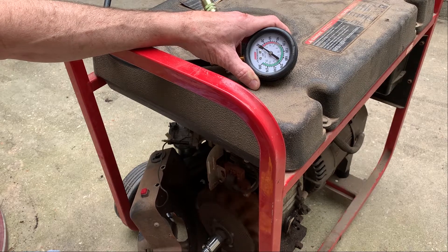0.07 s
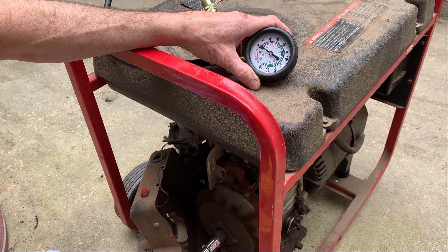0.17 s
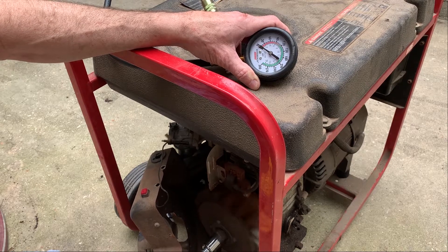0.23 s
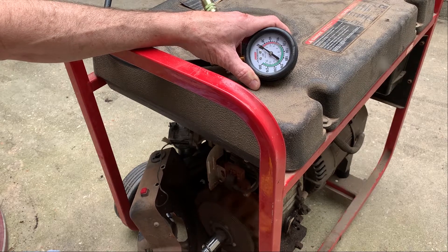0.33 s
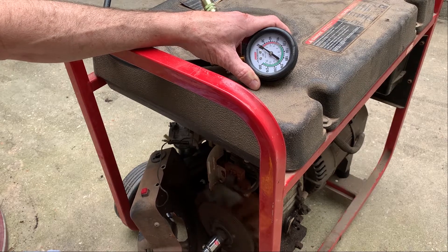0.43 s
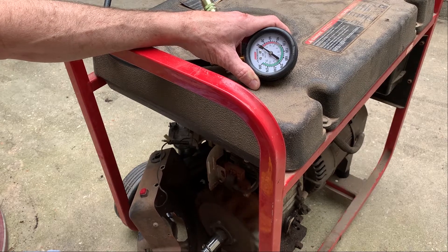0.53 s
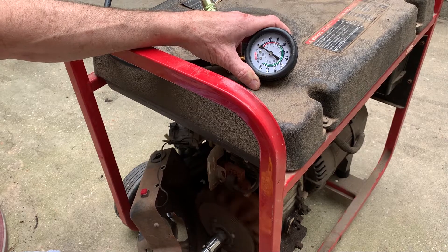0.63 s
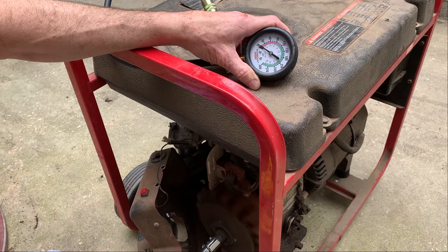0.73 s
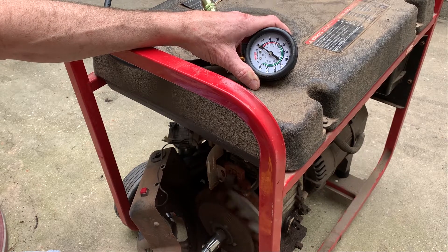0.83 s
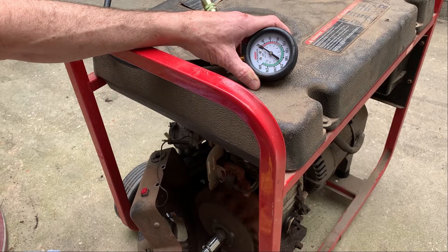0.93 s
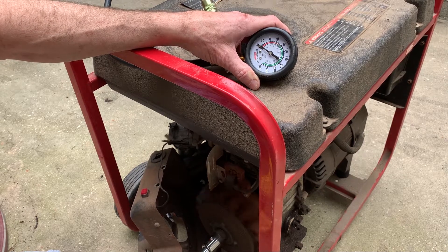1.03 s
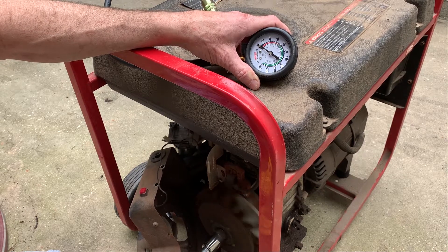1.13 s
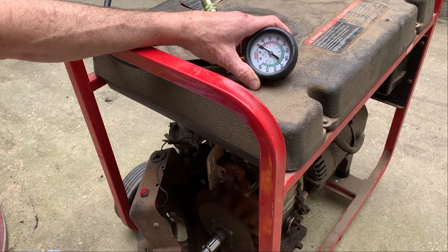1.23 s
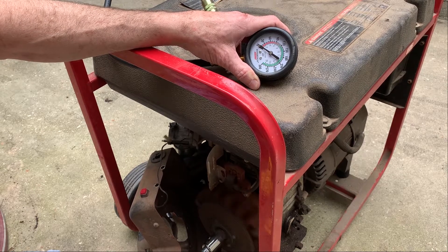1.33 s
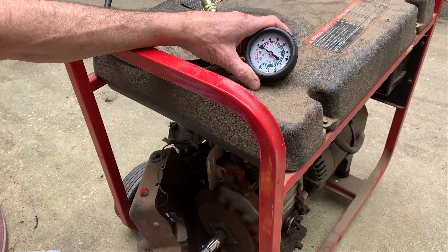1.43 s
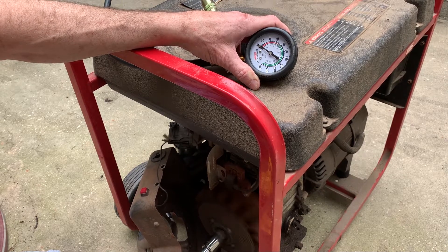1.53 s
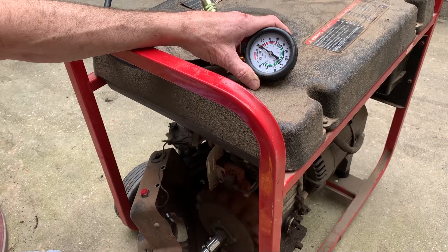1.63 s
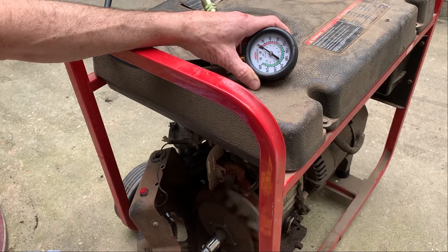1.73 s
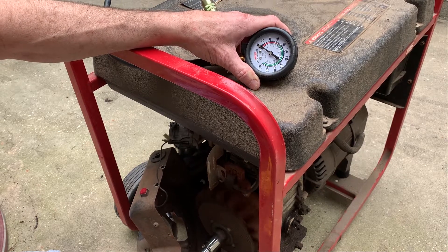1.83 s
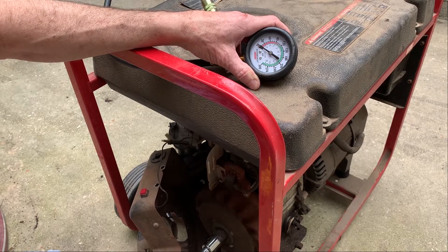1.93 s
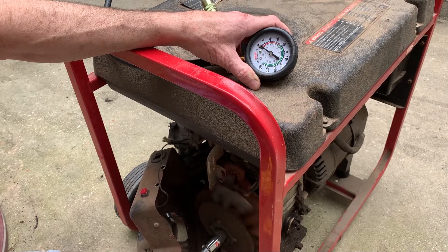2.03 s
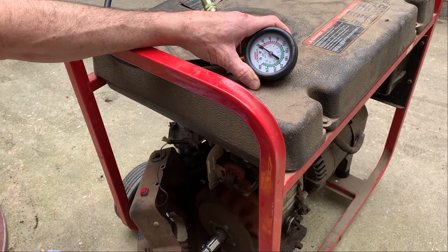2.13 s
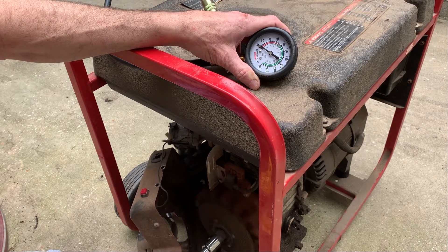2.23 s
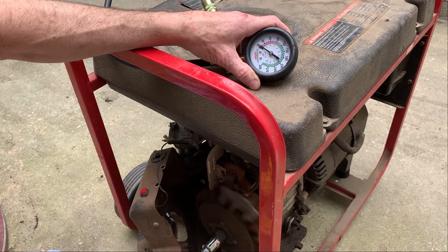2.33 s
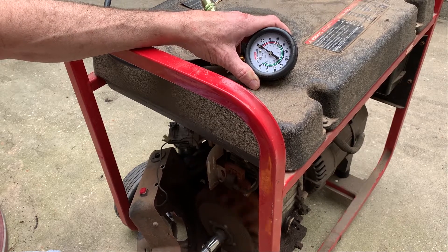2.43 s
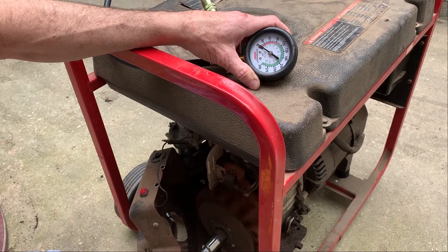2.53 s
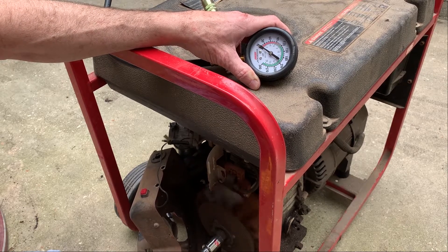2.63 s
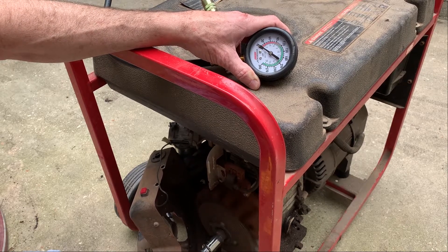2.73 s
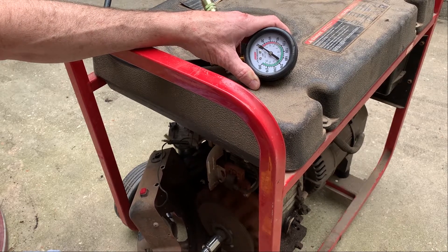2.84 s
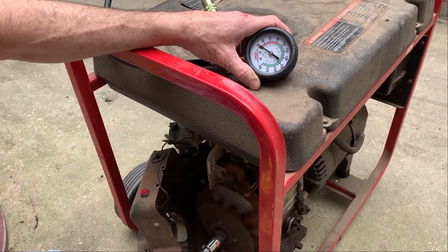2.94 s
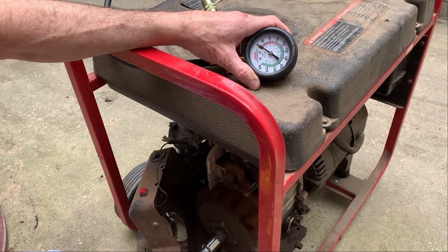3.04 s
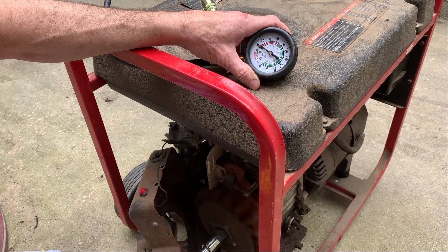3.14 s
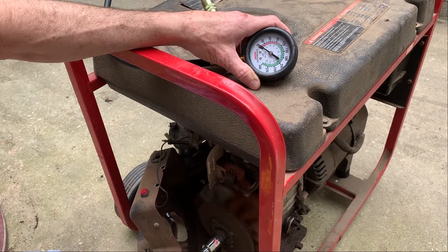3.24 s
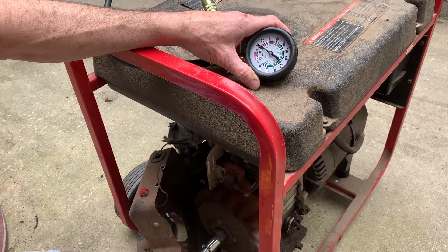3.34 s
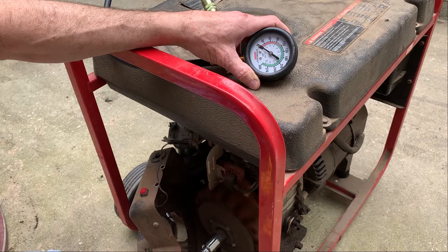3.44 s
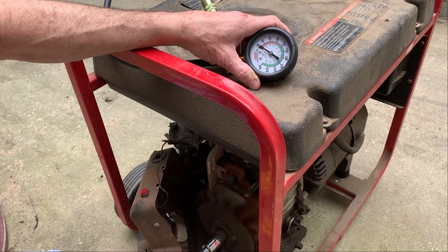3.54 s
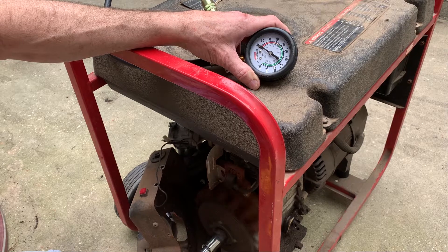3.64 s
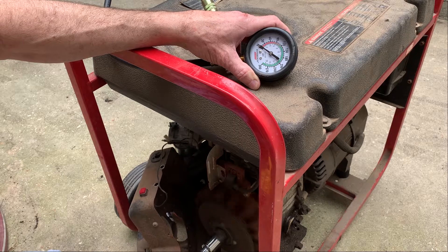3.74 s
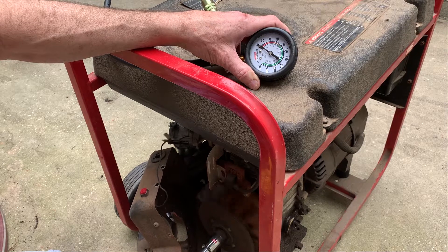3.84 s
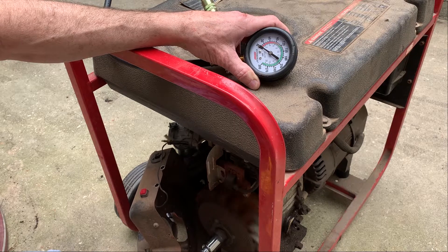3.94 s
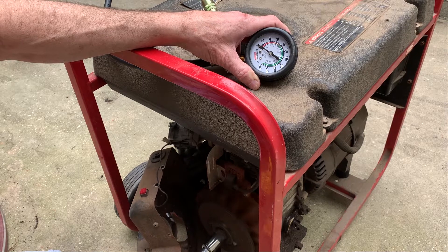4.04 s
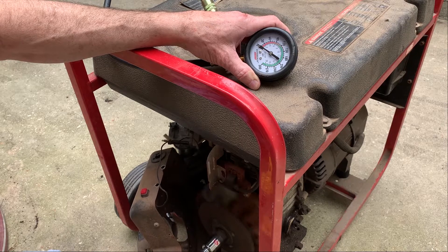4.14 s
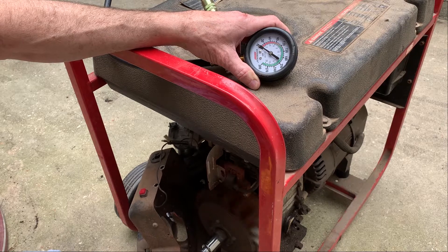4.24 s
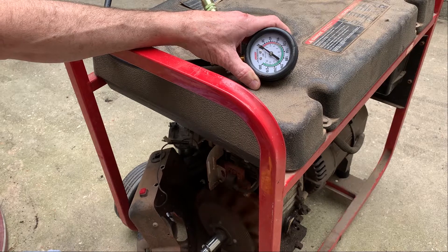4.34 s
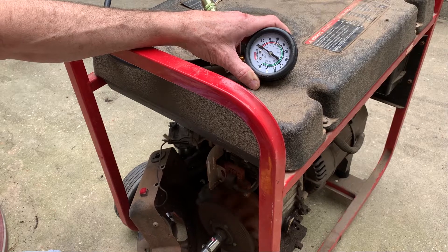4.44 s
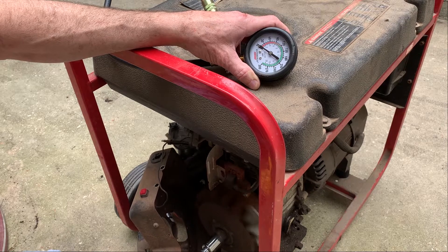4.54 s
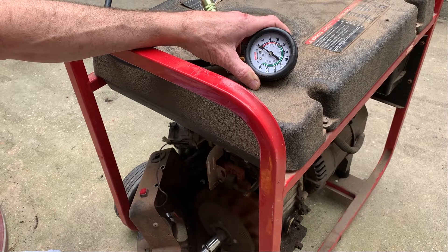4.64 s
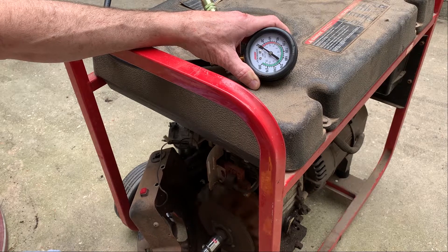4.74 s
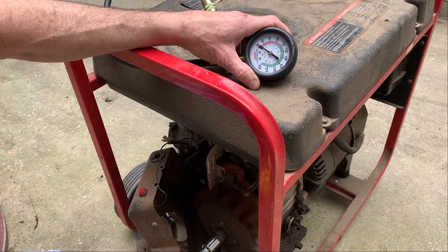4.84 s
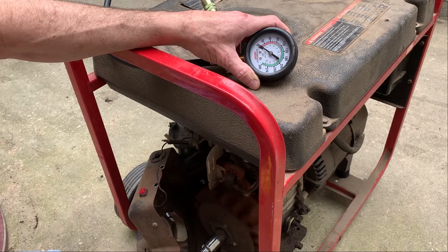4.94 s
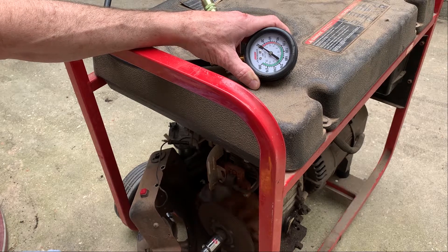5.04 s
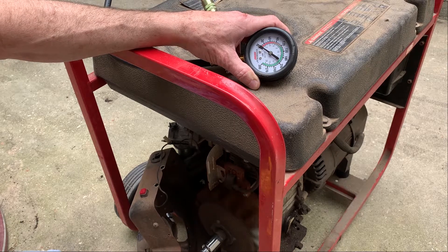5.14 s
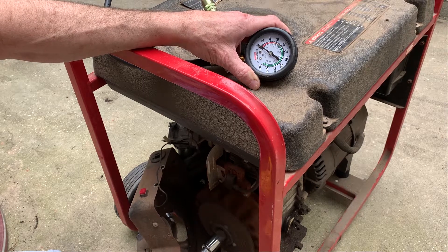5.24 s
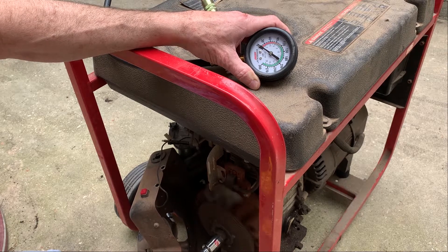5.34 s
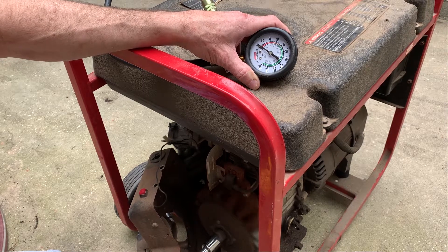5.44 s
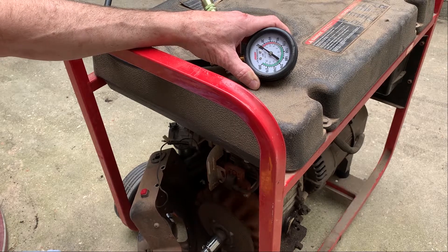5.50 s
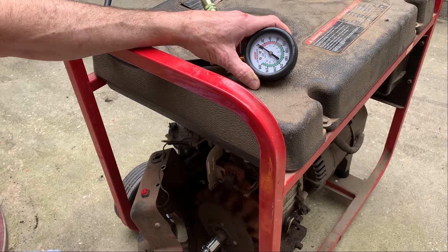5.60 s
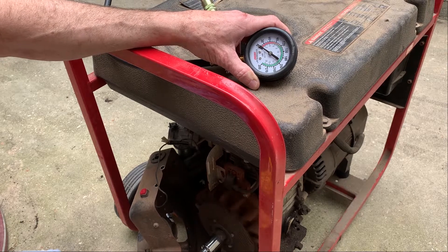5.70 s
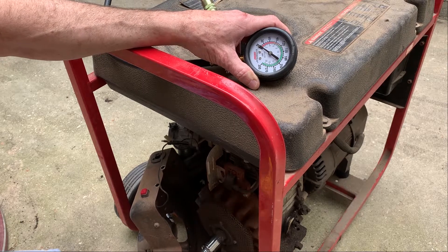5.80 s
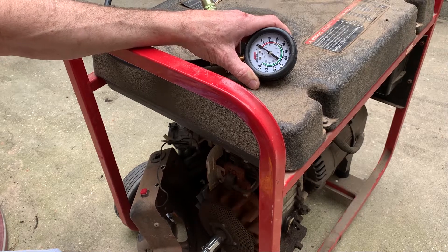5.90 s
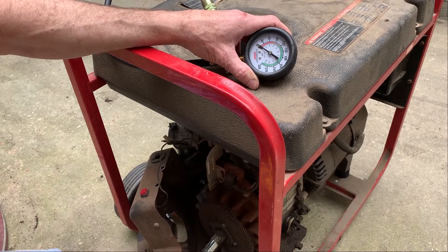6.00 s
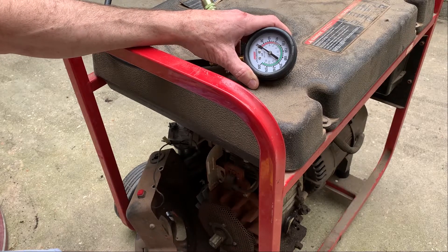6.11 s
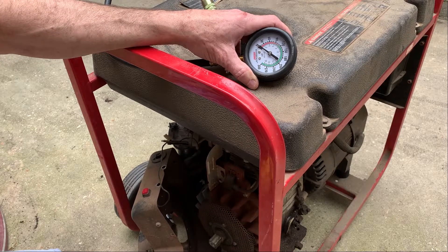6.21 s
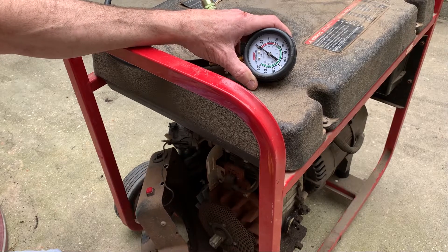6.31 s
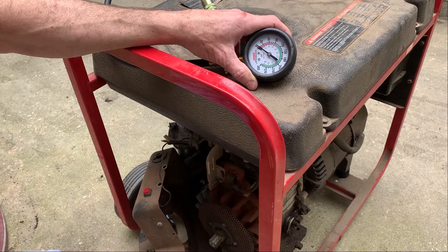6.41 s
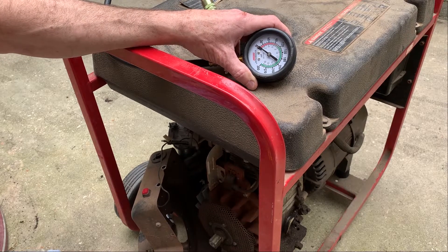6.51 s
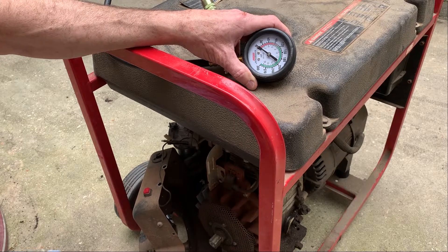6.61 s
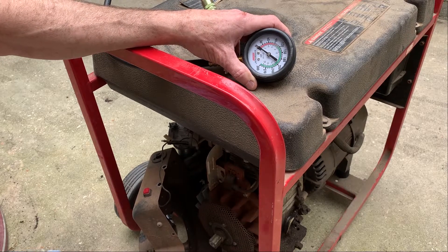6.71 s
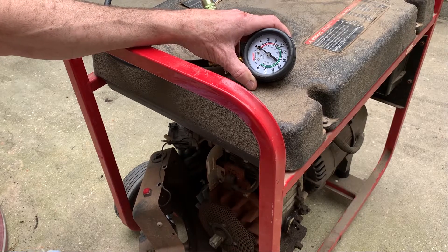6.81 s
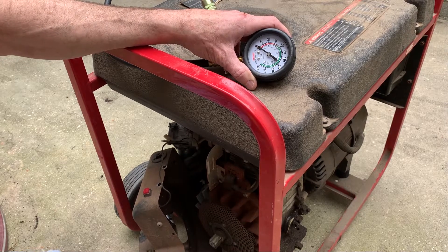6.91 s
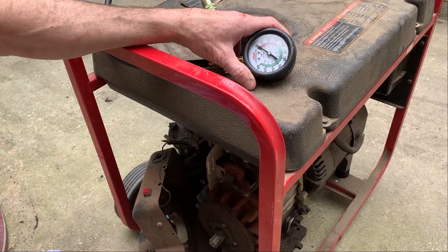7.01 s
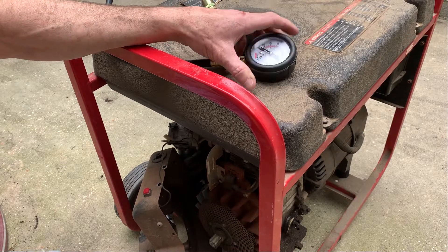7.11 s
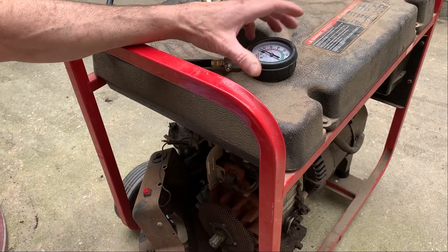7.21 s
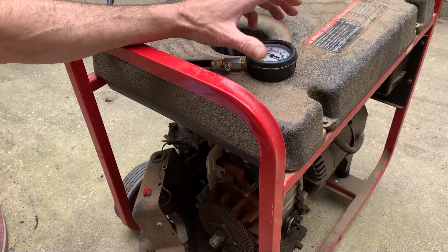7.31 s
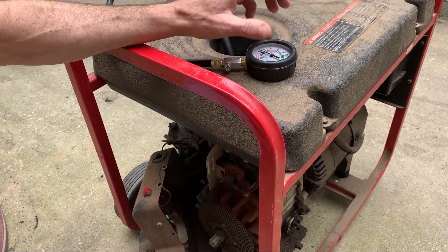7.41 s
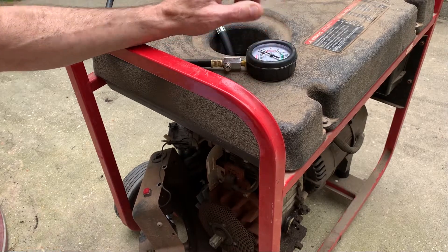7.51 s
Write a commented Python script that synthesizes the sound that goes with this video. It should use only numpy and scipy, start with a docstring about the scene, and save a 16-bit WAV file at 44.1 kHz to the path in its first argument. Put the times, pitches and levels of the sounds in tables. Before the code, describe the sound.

A starter motor cranks a small petrol engine that never fires, rattling in even pulses, then stops with clacks; a gauge knocks on the tank.

```python
"""Outdoors in a yard, an electric starter cranks a portable generator's petrol engine for a compression test.
It never fires: the pinion rattles on the flywheel teeth in repeating bursts over a gliding motor whine.
The frame thumps twice in each engine cycle, with short groans and hollow gulps of air.
The starter lets go, the engine coasts and rocks back with a clack; the gauge is put down on the tank.
Noise rings steel modes and gives the rasp; damped sines make the knocks, over low background noise."""
import sys
import numpy as np
from scipy import signal
from scipy.fft import rfft, irfft, next_fast_len
from scipy.io import wavfile
from scipy.ndimage import map_coordinates

SR = 44100
rng = np.random.default_rng(int(sys.argv[2]) if len(sys.argv) > 2 else 0)


def wrap_up_sound(samples):
    """Save the sound to the file named by the first command line argument, as 16-bit audio."""
    columns = np.atleast_2d(samples).T
    # keep every value between -1 and 1, then stretch to whole-number steps
    tamed = np.clip(columns, -1, 1)
    steps = np.round(tamed * 32767).astype(np.int16)
    wavfile.write(sys.argv[1], SR, steps)


N = 333396
TIME = np.arange(N) / SR

# timing of the engine cycles, and when the starter lets go
CYCLE_S, FIRST_S, CYCLE_COUNT = .6128, .157, 9
LET_GO_S, LET_GO_T60_S = 5.565, .19
# rise and decay of the rattle bursts, driven and coasting
RATTLE_ATTACK_S, RATTLE_T60_S = .004, .057
COAST_ATTACK_S, COAST_T60_S = .025, .41
CASING_DB_PER_S = .43  # the casing booms more as the cranking goes on
# the ring gear's high modes
TOOTH_MODE_COUNT, CONTACT_COUNT, TOOTH_T60_S = 260, 14, .06
TOOTH_RING = .6  # share of the rasp's power that rings
GROAN_SCATTER_DB, GROAN_DRIFT = 2, .013  # drift is a share of the pitch
TICK_T60_S = .03
TOP_HZ, TOP_EDGE_HZ = 15900, 400  # upper band limit and the width of its slope

# outdoor rumble: start_s, level_db
RUMBLE_LEVEL = [(0, -73), (4.2, -78), (4.7, -57), (5.8, -59), (6.1, -69.5), (7.56, -67)]
# tone of the yard background: freq_hz, level_db
YARD_COLOUR = [(25, -28), (55, -5), (95, -3), (140, -12), (280, -22), (600, -32), (1500, -42), (4500, -46),
               (8000, -57), (15000, -70)]
# diffuse answer of the surroundings: freq_hz, t60_s
WALL_DECAY = [(150, 0.39), (1500, 0.19), (12000, 0.13)]
# phase between the two microphone ports: freq_hz, left_lead_rad
PORT_PHASE = [(1200, 0), (3700, -2.2), (5700, -3.6), (6500, -6), (8000, -8.7), (8650, -9.42),
              (10900, -12.57), (13400, -15.7), (15600, -18.8)]
# the hand shifts the gauge over the tank: start_s, level_db
RUB_LEVEL = [(6.85, -79), (6.97, -61), (7.01, -51.5), (7.08, -68), (7.16, -62), (7.25, -55), (7.33, -78)]
# tone of that rubbing: freq_hz, level_db
RUB_COLOUR = [(70, -18), (150, 3), (400, -1), (900, -13), (2000, -30), (6000, -55)]
# the gauge lands and settles: start_s, level_db, tilt_db_per_octave
GAUGE_KNOCKS = [(7.175, -30, 2.5), (7.184, -47, -4.5), (7.195, -36.5, -9), (7.229, -59, 4.5)]
# resonances of the hollow tank: pitch_hz, level_db, t60_s
TANK_MODES = [(139.4, -3, 0.087), (230, -6.5, 0.085), (355, -0.5, 0.048), (610, -7, 0.045),
              (1010, -11, 0.03), (1380, -15, 0.034)]
# contact noise on the tank: freq_hz, level_db
TANK_COLOUR = [(70, -18), (150, 3.5), (380, -2), (650, -12), (1300, -19), (2200, -18), (5000, -31),
               (15000, -43)]
# loose metal parts tick in the stopping engine and the gauge: start_s, level_db, pitch_hz
METAL_TICKS = [(5.561, -29, 6530), (5.676, -37, 5070), (5.696, -34, 5100), (5.917, -47, 6000),
               (5.927, -53, 6500), (5.951, -50, 6000), (7.174, -47, 1980), (7.178, -61, 6600),
               (7.186, -55, 8000), (7.471, -69, 4960)]
# scrapes as the engine rocks back and the hand leaves the gauge:
# centre_s, half_length_s, pitch_hz, glide_hz_per_s, level_db
SCRAPE_EVENTS = [(6.014, 0.03, 656, 700, -47.5), (6.044, .008, 920, -0.5, -41), (6.283, 0.015, 504, 0, -52),
                 (7.459, .011, 491, 300.5, -62)]
# gear play closes as the engine slows and rocks back: start_s, level_db, t60_s
CLACK_EVENTS = [(5.628, -34, 0.053), (5.698, -43, 0.054), (5.985, -48, 0.054), (6.041, -25, 0.051),
                (6.066, -34, .05), (6.086, -36, 0.06), (6.213, -48, .05), (6.268, -37.5, 0.046),
                (6.311, -50.5, 0.037)]
# tone of the clacks: freq_hz, level_db
CLACK_COLOUR = [(150, -36), (450, -12), (930, -2), (1250, -6), (2800, -10), (5000, -24.5), (10000, -21),
                (15000, -21)]
# the frame jolts as the piston turns: cycle_s, level_db
FRAME_JOLTS = [(.001, -29.5), (.29, -28.5)]
# resonances of the frame: pitch_hz, level_db, t60_s
FRAME_MODES = [(75, -20, 0.081), (144, -1, 0.033), (188.8, 2, 0.06), (255, -0.5, 0.021)]
# air gulps through the valves: cycle_s, half_length_s, pitch_hz, glide_hz_per_s, level_db
AIR_GULPS = [(0.359, 0.01, 610, -1500, -41.5), (0.53, 0.0083, 470, -500, -47)]
# whine of the starter motor, sagging and recovering with the load: cycle_s, pitch_hz
WHINE_PITCH = [(0, 2060), (.05, 2150), (.13, 2260), (.16, 2175), (.2, 2275), (.25, 2340), (.275, 2440),
               (.33, 2390), (.38, 2216), (.41, 2215), (.46, 1977), (.55, 1993), (.613, 2100)]
# lines of the whine: pitch_multiple, level_db
WHINE_LINES = [(.41, -49), (1, -42.5), (2, -42), (3, -47)]
# the gears groan as the starter strains against the piston: cycle_s, half_length_s, pitch_hz, level_db
GROAN_STRAINS = [(.048, 0.0073, 1516, -35), (0.238, 0.0087, 1028, -34.5), (0.272, .008, 1253, -39),
                 (0.273, 0.012, 1078, -32), (.286, .011, 2766, -35), (0.288, 0.013, 1509, -31),
                 (0.523, 0.0059, 1020, -35), (0.585, 0.012, 1044, -33.5), (.605, 0.018, 1080, -36),
                 (0.607, .0094, 2760, -35.5), (.612, .012, 1505, -32)]
# how hard the starter drives the gears: start_s, level_db
STARTER_DRIVE = [(0.0, -0.5), (0.45, 2), (0.62, 1.0), (0.92, 0.0), (1.05, 1.5), (1.5, -0.5), (1.7, 2.5),
                 (1.87, -2.5), (2.05, 2), (2.3, 3.0), (2.5, -0.5), (2.85, 2), (3.05, -1), (3.25, 0.5),
                 (3.48, 2.5), (3.7, -0.5), (4.08, 1.5), (4.3, 0), (4.55, -3), (4.72, -1.5), (4.9, -3.5),
                 (5.08, 0), (5.3, -2), (5.5, -2.5)]
# rattles as the load on the crank changes: cycle_s, hold_s, casing_db, flywheel_db, rasp_db
LOAD_RATTLES = [(0.037, 0.032, -3.5, 2, 2), (0.07, 0.025, 0, -2, 1.0), (0.099, 0.015, -13.5, -5.5, -4.5),
                (0.153, 0.026, 1, 1.5, 1.5), (0.186, 0.048, -15, -10.5, -4.5), (0.225, 0.03, -6, -3.5, 3),
                (0.254, 0.024, -11.5, 2.5, -1.5), (0.284, 0.033, 2.5, 0.5, 3),
                (0.319, 0.031, 3.5, -4.5, -3), (0.34, 0.028, 6.0, -3.5, -2),
                (0.385, 0.014, -9.5, -3.5, 0.5), (0.448, 0.024, 5, -3.5, -1.5),
                (0.479, 0.026, -2, -6, -8.5), (0.514, 0.03, 0, 0.5, -1), (0.566, 0.031, -5, 3, 0),
                (0.607, 0.027, 2.5, 3.0, 1.5)]
# steady meshing between the bursts, one level_db each for casing, flywheel and rasp
MESH_LEVEL_DB = [-3, -5.5, -5.5]
# single extra rattle bursts on top of the repeating ones: start_s, hold_s, level_db
EXTRA_RATTLES = [(0.018, 0.035, 1), (0.357, 0.02, 2.5), (0.398, 0.018, 5.5), (0.525, 0.014, 2.5),
                 (1.009, 0.018, 2.5), (1.138, 0.017, -1), (1.299, 0.013, 2.5), (1.542, 0.015, -3),
                 (1.755, 0.038, -0.5), (2.444, 0.01, 1), (2.676, 0.017, 2.5), (2.768, 0.018, 0),
                 (2.812, 0.014, 1.5), (3.171, 0.015, 0), (4.018, 0.032, 0.0), (4.392, 0.028, 3),
                 (4.548, 0.023, -0.5), (4.629, 0.014, -2.5), (4.704, 0.017, 2.5), (4.861, 0.014, -12),
                 (5.08, 0.015, -5), (5.164, 0.016, 0.5), (5.239, 0.02, 1), (5.318, 0.029, 0.5)]
# loose gears as the engine coasts, rocks back and settles: start_s, hold_s, casing_db, flywheel_db, rasp_db
COAST_RATTLES = [(5.52, 0.035, -6, -7.5, -24), (5.6, 0.07, -5.5, -18.5, -12), (5.68, 0.054, -7, -8.5, -13),
                 (5.77, 0.039, -4.5, -12.5, -18.5), (5.89, 0.051, -14, -40, -29),
                 (5.975, 0.066, -9, -17.5, -22.5), (6.03, 0.029, 4, -10.5, -11.5),
                 (6.175, 0.054, -9.5, -14, -24), (6.255, 0.05, -6, -21, -31),
                 (6.385, 0.052, -20, -28.5, -24.5)]
# centres of casing, flywheel and tooth rasp: one freq_hz each
PART_CENTRE_HZ = [610, 1080, 6360]
# scraping spectrum of the teeth before mixing: freq_hz, density_db_per_hz
RASP_COLOUR = [(90, -88.5), (300, -80), (600, -74), (1000, -68.5), (1650, -80), (2200, -69.5),
               (2900, -72.5), (4300, -76.5), (5600, -72.5), (7000, -70.5), (8500, -64), (10000, -69.5),
               (12000, -69), (15000, -77)]
# resonances of the engine casing: pitch_hz, width_hz, level_db, ear_phase_rad
CASING_MODES = [(400.5, 130, -53, 0.42), (486, 17, -64, 0.83), (560.5, 80, -58.5, 0.92), (665, 78, -51, 1)]
# resonances of flywheel and ring gear: pitch_hz, width_hz, level_db, ear_phase_rad
STEEL_MODES = [(808, 24, -49.5, 1), (1001.5, 34, -48, 0.16), (1081, 60, -41.5, 0.5),
               (1264.5, 27, -45.5, -1.4), (1334, 30, -48, -0.5), (1441, 23, -43.5, 0.5),
               (1506, 12, -48, 0.5), (1772, 50, -45, 1), (1894, 40, -42, 1), (2047, 97, -43.5, 0.5),
               (2224, 28, -42.5, 1.04), (2413, 50, -38.5, 2.5), (2490, 33, -41.5, 1.5),
               (2607, 69, -48, 1.5), (2712, 52, -42, 2.5), (3003, 27, -41.5, 2.5), (3080, 30, -44.5, 2),
               (3400, 110, -44.5, 1.5), (3698, 76, -40, 1.43), (4025, 193, -40, 3.5), (4124, 86, -39, 1.1),
               (4520, 140, -44, -1), (4910, 700, -38.5, 1.32), (6080, 65, -40, 0.82), (6790, 280, -40, 0),
               (7100, 70, -43.5, 2), (7140, 82, -38.5, 2.5), (7930, 130, -38, 3.5)]


def amp(db):
    """Decibels to gain."""
    return 10 ** (np.asarray(db) / 20)


def unit(x):
    """Scale to rms 1."""
    return x / np.sqrt(np.mean(x ** 2) + 1e-20)


def along(points, hz):
    """Read (Hz, value) points on a log axis."""
    f, v = np.transpose(points)
    return np.interp(np.log(hz + 1), np.log(f), v)


def curves(rows, at=TIME):
    """Each column after the time, joined by straight lines."""
    s, *cols = np.transpose(rows)
    return np.array([np.interp(at, s, c) for c in cols])


def wobble(rate):
    """A smooth random curve, rate knots a second."""
    return map_coordinates(rng.standard_normal(int(N * rate / SR) + 4), [TIME * rate])


def filtered(x, response):
    """x times a complex response of frequency."""
    size = next_fast_len(N + SR // 4)
    return irfft(rfft(x, size) * response(np.fft.rfftfreq(size, 1 / SR)), size)[..., :N]


def noise(colour, apart):
    """Coloured stereo noise of rms 1; apart is the size of what the ears do not share."""
    mid, side = rng.standard_normal((2, N))
    stereo = np.array([mid + apart * side, mid - apart * side])
    return unit(filtered(stereo, lambda hz: amp(along(colour, hz))))


def add(track, s, sound):
    """Mix a sound into a track at time s."""
    start = round(s * SR)
    track[start:start + len(sound)] += sound[:N - start]


def struck(modes, attack, scatter_db, tilt_db=0):
    """One blow on a body: damped modes of alternating sign, with optional random strengths and tilt."""
    t = np.arange(SR // 3) / SR
    ring = 0
    for k, (hz, db, t60) in enumerate(modes):
        octaves = np.log2(hz / modes[0][0])
        level_db = db + scatter_db * rng.normal() + tilt_db * octaves
        ring = ring + (-1) ** k * amp(level_db - 60 * t / t60) * np.sin(2 * np.pi * hz * t)
    return ring * (1 - np.exp(-t / attack))


def hoot(hz, width_hz):
    """Narrow noise of rms 1 round a moving pitch, from two slow random curves on sine and cosine."""
    phase = 2 * np.pi * np.cumsum(hz) / SR
    return unit(wobble(width_hz) * np.sin(phase) + wobble(width_hz) * np.cos(phase))


def cycle_time():
    """Seconds into the current engine cycle."""
    return (TIME - FIRST_S) % CYCLE_S


def starter_on():
    """Fade that closes the whine, groans and gulps as the starter is switched off."""
    return np.interp(TIME, [5.45, 5.55], [1, 0])


def swell(s, length):
    """A smooth swell at the same point of every cycle while the starter drives; also time from its peak."""
    away = (TIME - FIRST_S - s + CYCLE_S / 2) % CYCLE_S - CYCLE_S / 2
    level = np.exp(-.5 * (away / length) ** 2)
    return level * amp(curves(STARTER_DRIVE)[0]) * starter_on(), away


def ports(x):
    """Direct sound from the engine reaches one port before the other."""
    ears = np.array([[1], [-1]])
    return filtered(x, lambda hz: np.exp(.5j * np.interp(hz, *np.transpose(PORT_PHASE)) * ears))


def close_ports(x):
    """Long waves reach both ports alike: diffuse sound is nearly mono in the bass."""
    mid = x.mean(axis=0)
    side_colour = [(90, -19.5), (300, -7.0), (900, 2.0)]
    return mid + filtered(x - mid, lambda hz: amp(along(side_colour, hz)))


def yard():
    """Low outdoor noise with a rumble that sinks, then swells before the starter lets go."""
    rumble_colour = [(20, -21.5), (42, -3.0), (60, -11.0), (120, -45.0), (400, -110)]
    rumble = amp(curves(RUMBLE_LEVEL)[0]) * noise(rumble_colour, apart=.11)
    background = amp(-51.5 + .25 * wobble(22)) * noise(YARD_COLOUR, apart=1)
    return rumble + close_ports(background)


def walls(x):
    """A short, dull, diffuse answer: decaying noise whose treble dies first."""
    hz, t, grains = signal.stft(rng.standard_normal((2, SR // 3)), SR, nperseg=256)
    decay = amp(-60 * t / along(WALL_DECAY, hz)[:, None])
    tail = signal.istft(grains * decay, SR)[1]
    answer = signal.fftconvolve(x, tail / np.linalg.norm(tail[0]), axes=1)[:, :N]
    answer = filtered(answer, lambda hz: amp(along([(4000, 5.0), (8000, -20.5)], hz)))
    return close_ports(answer)


def gauge():
    """The rubber-cased gauge slides dully, then knocks on the hollow tank with a puff of contact noise."""
    fade = np.interp(TIME, [6.75, 6.85, 7.33, 7.4], [0, 1, 1, 0])
    rub = amp(curves(RUB_LEVEL)[0]) * fade * noise(RUB_COLOUR, apart=.18)
    ring, contact = np.zeros(N), 0
    for s, db, tilt_db in GAUGE_KNOCKS:
        add(ring, s, amp(db) * struck(TANK_MODES, attack=.00093, scatter_db=.9, tilt_db=tilt_db))
        contact = contact + amp(db - 10 - 60 * np.abs(TIME - s) / .11) * (TIME >= s)
    return rub + ring + contact * noise(TANK_COLOUR, apart=.26)


def ticks():
    """Small, bright contacts of loose metal parts: decaying band noise, independent in each ear."""
    out, t = np.zeros((2, N)), np.arange(SR // 16) / SR
    for s, db, hz in METAL_TICKS:
        band = signal.butter(2, [.75 * hz, 1.35 * hz], "band", fs=SR)
        for ear in out:
            grain = unit(signal.lfilter(*band, rng.standard_normal(len(t))))
            add(ear, s, amp(db - 60 * t / TICK_T60_S) * grain)
    return out


def scrapes():
    """Single soft, hollow scrapes after the cranking: swells of narrow noise with a moving pitch."""
    out = np.zeros(N)
    for s, length, hz, glide, db in SCRAPE_EVENTS:
        away = TIME - s
        out += amp(db) * np.exp(-.5 * (away / length) ** 2) * hoot(hz + glide * away, width_hz=140)
    return out


def clacks():
    """Short, hard noise bursts as the gear play closes."""
    envelope = sum(amp(db - 60 * np.abs(TIME - s) / t60) * (TIME >= s) for s, db, t60 in CLACK_EVENTS)
    return envelope * noise(CLACK_COLOUR, apart=.93)


def thumps():
    """Two jolts in every cycle shake the frame on its mounts and ring its low modes."""
    out = np.zeros(N)
    for cycle in range(CYCLE_COUNT):
        for s, db in FRAME_JOLTS:
            blow = struck(FRAME_MODES, attack=.0022, scatter_db=0)
            add(out, FIRST_S + cycle * CYCLE_S + s, amp(db) * blow)
    return out


def gulps():
    """Short, hollow, falling gulps of air in every cycle, as gliding narrow noise."""
    out = np.zeros(N)
    for s, length, hz, glide, db in AIR_GULPS:
        level, away = swell(s, length)
        out += amp(db) * level * hoot(hz + glide * away, width_hz=110)
    return out


def whine():
    """Gliding lines that follow the speed of the starter motor until it is switched off."""
    hz, = curves(WHINE_PITCH, cycle_time())
    phase = 2 * np.pi * np.cumsum(hz * (1 + .006 * wobble(9))) / SR
    phase = phase + .22 * wobble(160)
    lines = sum(amp(db + 2.9 * wobble(40)) * np.sin(multiple * phase) for multiple, db in WHINE_LINES)
    return ports(starter_on() * lines)


def groan():
    """Under peak load the mesh chatters at single resonances, almost a tone, never at quite the same pitch."""
    out = np.zeros(N)
    for s, length, hz, db in GROAN_STRAINS:
        phase = 2 * np.pi * np.cumsum(hz * (1 + GROAN_DRIFT * wobble(22))) / SR
        phase = phase + .16 * wobble(110)
        level = swell(s, length)[0] * amp(db + GROAN_SCATTER_DB * wobble(25))
        out += level * np.sin(phase)
    return out


def bursts(rows, at, attack, t60):
    """Power of rattle bursts that rise, hold and die away, one row for each level column."""
    power = 0
    for s, hold, *part_db in rows:
        rise = np.clip((at - s) / attack, 0, 1)
        shape = rise * amp(-60 * np.maximum(at - s - hold, 0) / t60)
        power = power + np.outer(amp(part_db), shape) ** 2
    return power


def gear_load(flutter_db):
    """Casing, flywheel and rasp in dB: repeating bursts and single extra bursts, then the run-down."""
    rattles = 0
    # the second pass carries burst tails over into the next cycle
    for at in (cycle_time(), cycle_time() + CYCLE_S):
        rattles = rattles + bursts(LOAD_RATTLES, at, RATTLE_ATTACK_S, RATTLE_T60_S)
    drive_db = curves(STARTER_DRIVE)[0] - 60 * np.maximum(TIME - LET_GO_S, 0) / LET_GO_T60_S
    mesh = amp(MESH_LEVEL_DB)[:, None] ** 2
    extra = bursts(EXTRA_RATTLES, TIME, RATTLE_ATTACK_S, RATTLE_T60_S)
    cranking = (rattles + mesh) * amp(drive_db) ** 2 + extra
    cranking[0] *= amp(CASING_DB_PER_S * (TIME - LET_GO_S / 2)) ** 2
    coasting = bursts(COAST_RATTLES, TIME, COAST_ATTACK_S, COAST_T60_S)
    return 10 * np.log10(cranking + coasting + 1e-12) + flutter_db * wobble(45)


def tooth_blows(rate, jitter, size_db, life, slide):
    """Force envelope of the teeth: loose, uneven blows that follow the starter's speed, over steady sliding."""
    speed = unit(curves(WHINE_PITCH, cycle_time())[0])
    passed = np.cumsum(rate * speed) / SR
    draws = rng.standard_normal((int(passed[-1]), 2))
    when = np.interp(np.arange(len(draws)) + jitter * draws[:, 0], passed, np.arange(N))
    blows = np.bincount(when.astype(int), amp(size_db * draws[:, 1]) ** 2, N)
    # each blow's power dies away with time constant life, in seconds
    power = signal.lfilter([1], [1, -np.exp(-1 / (life * SR))], blows)
    return unit(np.sqrt(power / power.mean() + abs(slide)))


def share(part, hz):
    """How much of a frequency belongs to casing, flywheel or tooth rasp."""
    return np.interp(np.log(hz + 1), np.log(PART_CENTRE_HZ), np.eye(3)[part])


def tooth_rings(force):
    """The ring gear's many high modes; each point of contact round the wheel rings its own mix of them."""
    t = np.arange(SR // 8) / SR
    hz = np.linspace(1200, TOP_HZ, TOOTH_MODE_COUNT) + rng.uniform(-50, 50, TOOTH_MODE_COUNT)
    turns = np.outer(hz, t) + rng.random((len(hz), 1))
    modes = np.sin(2 * np.pi * turns) * amp(-60 * t / TOOTH_T60_S)
    place = cycle_time() / CYCLE_S * CONTACT_COUNT
    out = np.zeros(N)
    for contact in range(CONTACT_COUNT):
        ring = rng.laplace(size=len(hz)) @ modes
        touching = place.astype(int) == contact
        out += signal.oaconvolve(force * touching, ring / np.linalg.norm(ring))[:N]
    return np.sqrt(TOOTH_RING) * out + np.sqrt(1 - TOOTH_RING) * force


def rasp(load_db, teeth, scattered):
    """The teeth scrape and ring, reaching one port before the other; some is scattered by the frame."""
    force = teeth * rng.standard_normal((3, N)) * np.sqrt(SR / 2)
    sound = 0
    for part in range(3):
        loaded = force * amp(load_db[part])
        sound = sound + filtered(loaded, lambda hz: share(part, hz) * amp(along(RASP_COLOUR, hz)))
    return ports(tooth_rings(sound[0])) + scattered * sound[1:]


def flywheel(load_db, teeth, swing_db):
    """The teeth ring the casing and steel as damped modes; each swells and sinks irregularly on its own."""
    out = np.zeros((2, N))
    ears = np.array([[1], [-1]])
    for hz, width, db, phase in [*CASING_MODES, *STEEL_MODES]:
        level_db = sum(share(part, hz) * load_db[part] for part in range(3)) + swing_db * wobble(18)
        damping = np.pi * width / SR
        force = teeth * rng.standard_normal(N) * amp(db + level_db) * 2 * np.sqrt(damping)
        # a mode takes up only the force near its own pitch
        band = signal.butter(1, [.85 * hz, 1.18 * hz], "band", fs=SR)
        force = signal.lfilter(*band, force)
        ring = signal.lfilter([1], [1, -np.exp(2j * np.pi * hz / SR - damping)], force)
        out += np.real(ring * np.exp(.5j * phase * ears))
    return out


def scene():
    """Gears, frame and gauge in the yard; once the starter lets go, the teeth knock more slowly and loosely."""
    load_db = gear_load(flutter_db=1.01)
    # rate in blows per second, jitter in blow spacings
    driven = tooth_blows(rate=380, jitter=.5, size_db=2.5, life=.002, slide=.9)
    loose = tooth_blows(rate=150, jitter=.4, size_db=3, life=.003, slide=.7)
    teeth = np.where(TIME < LET_GO_S, driven, loose)
    gears = amp(-3) * flywheel(load_db, teeth, swing_db=2)
    gears = gears + amp(-1.5) * rasp(load_db, teeth, scattered=.028)
    gears = gears + groan() + whine() + gulps() + scrapes()
    knocks = thumps() + clacks() + ticks() + gauge()
    direct = gears + knocks
    return direct + walls(amp(-13) * direct) + yard()


def record(dry):
    """The recorder thins the deepest bass and keeps nothing above its band limit."""
    bass_cut = [(20, -20.0), (32, -8.0), (42, 0)]

    def response(hz):
        """Bass cut times a straight slope at the band limit."""
        return amp(along(bass_cut, hz)) * np.clip((TOP_HZ - hz) / TOP_EDGE_HZ + .5, 0, 1)

    return filtered(dry, response)


dry = scene()
out = record(dry)
wrap_up_sound(out)
```